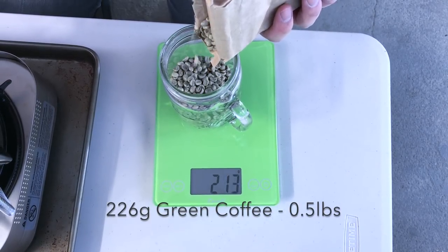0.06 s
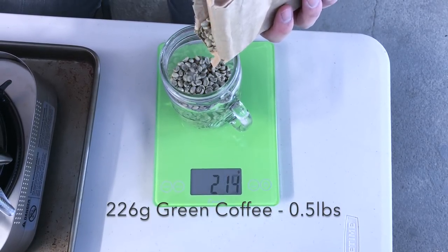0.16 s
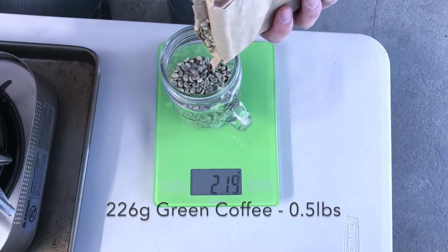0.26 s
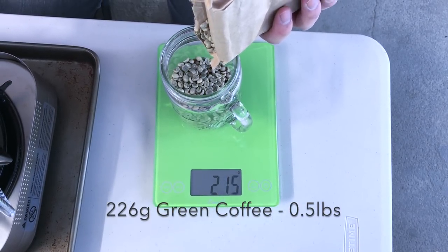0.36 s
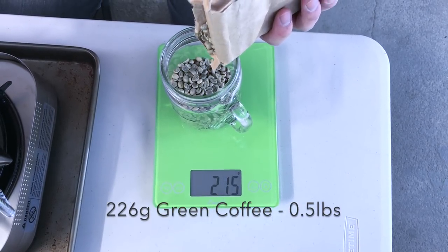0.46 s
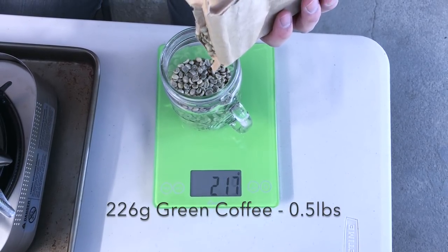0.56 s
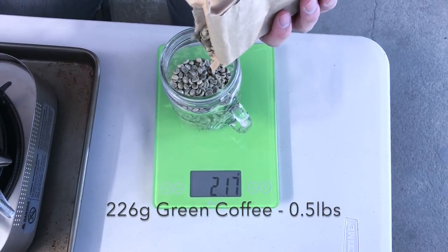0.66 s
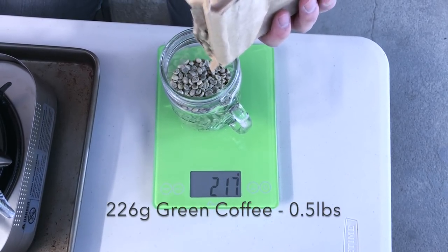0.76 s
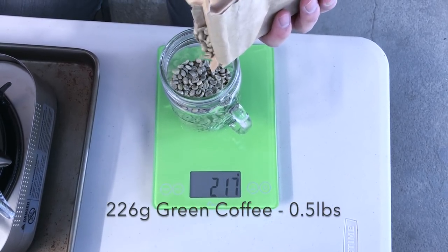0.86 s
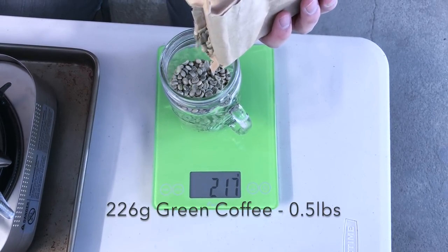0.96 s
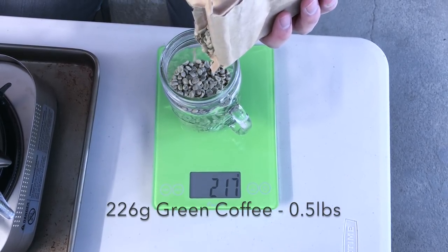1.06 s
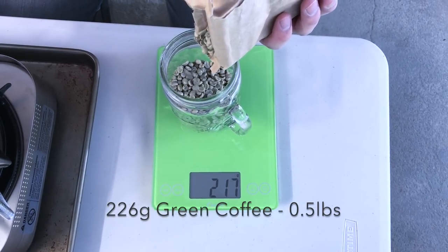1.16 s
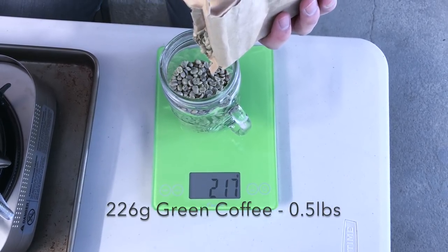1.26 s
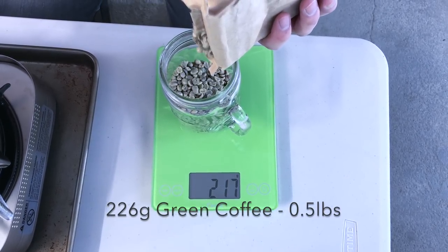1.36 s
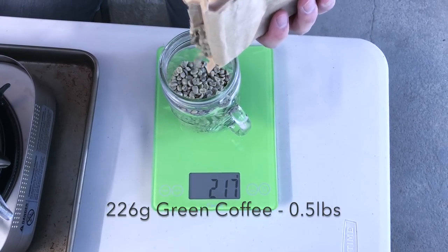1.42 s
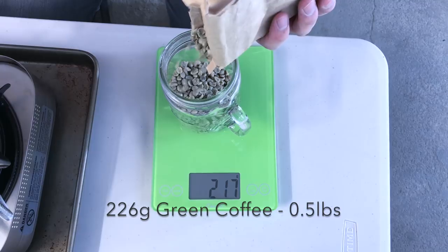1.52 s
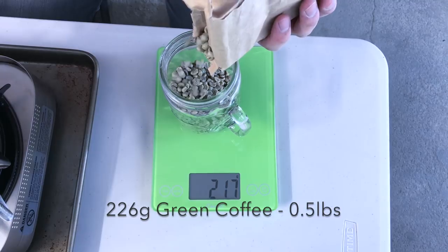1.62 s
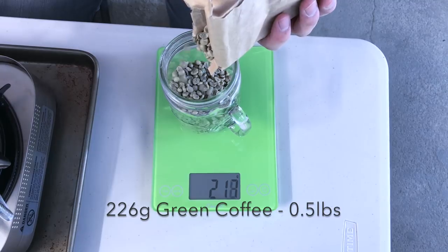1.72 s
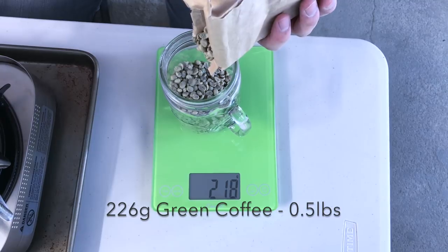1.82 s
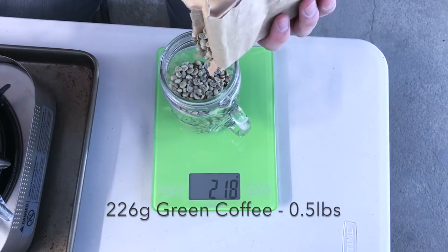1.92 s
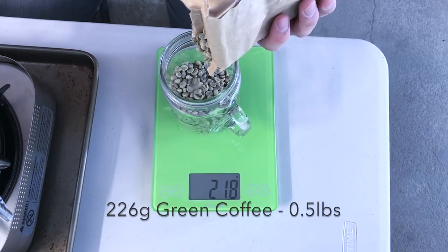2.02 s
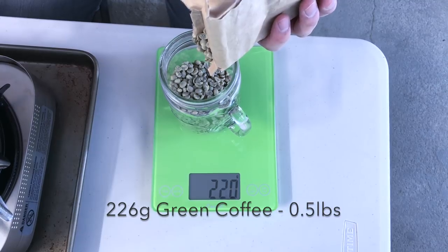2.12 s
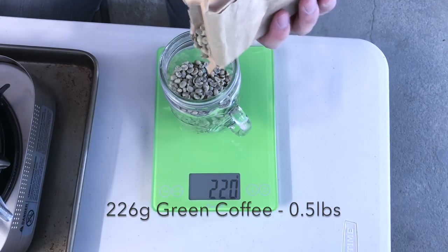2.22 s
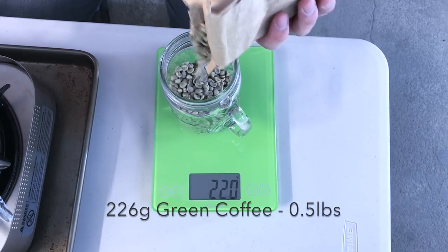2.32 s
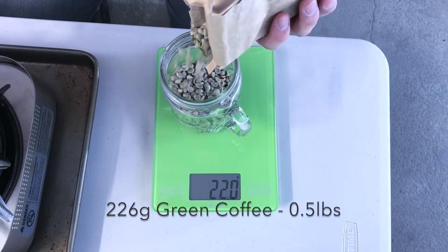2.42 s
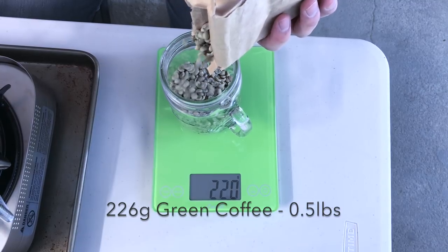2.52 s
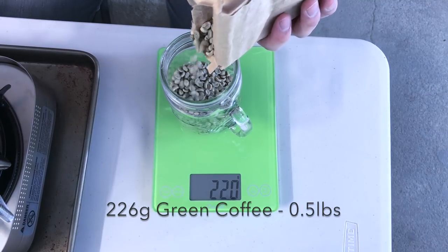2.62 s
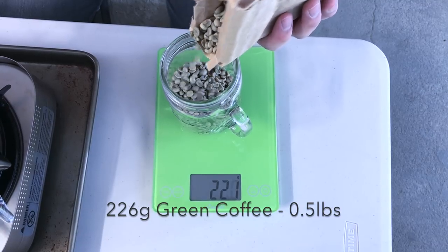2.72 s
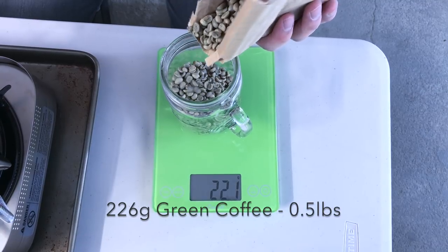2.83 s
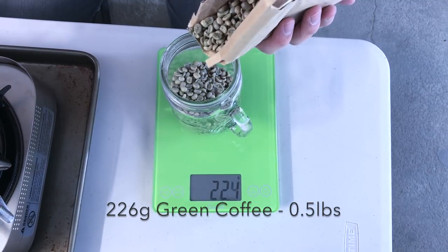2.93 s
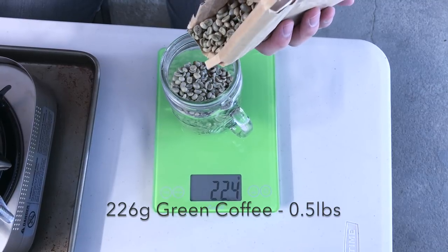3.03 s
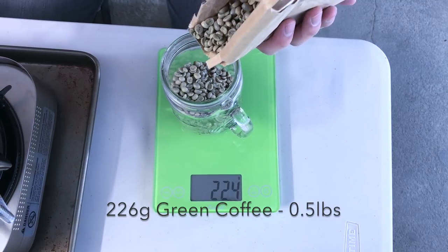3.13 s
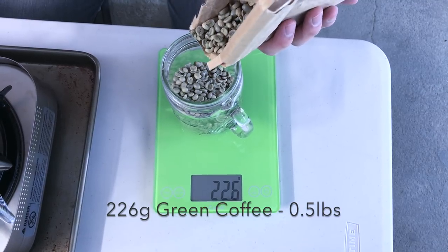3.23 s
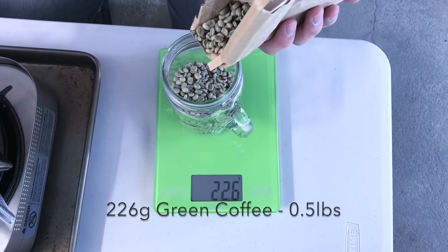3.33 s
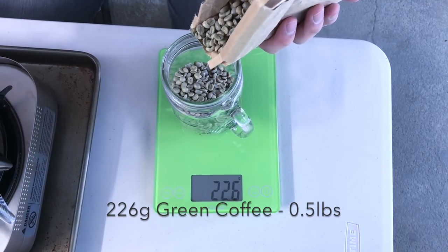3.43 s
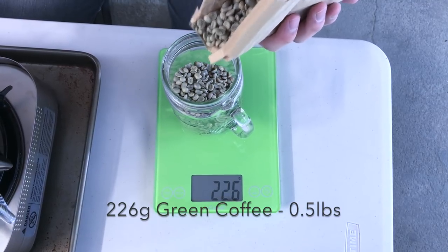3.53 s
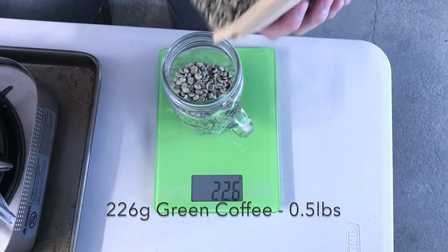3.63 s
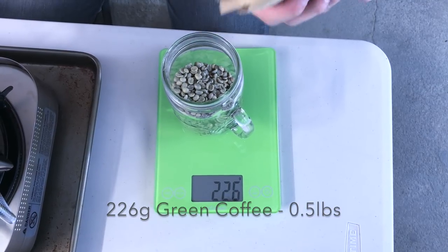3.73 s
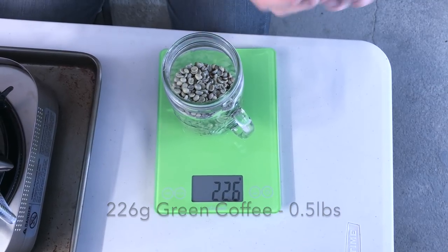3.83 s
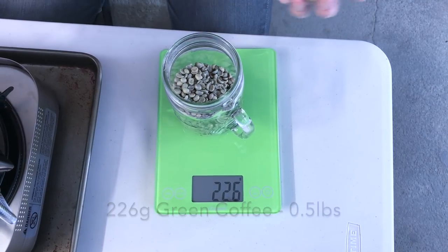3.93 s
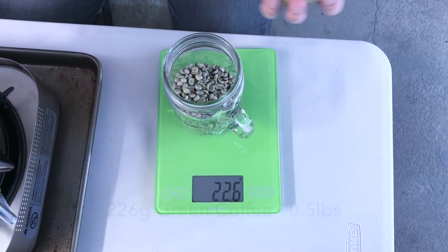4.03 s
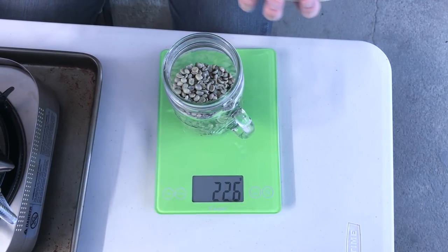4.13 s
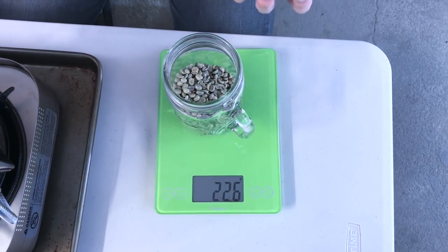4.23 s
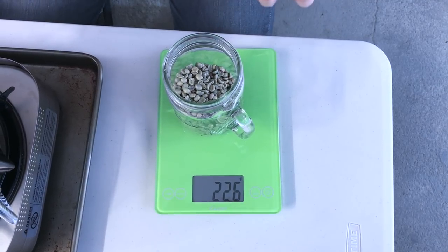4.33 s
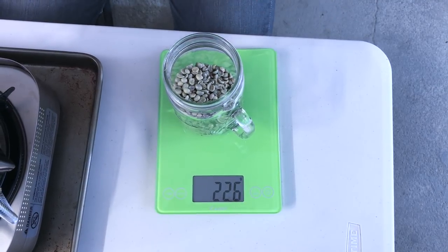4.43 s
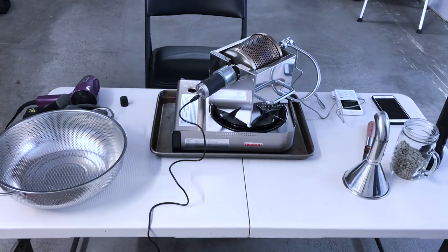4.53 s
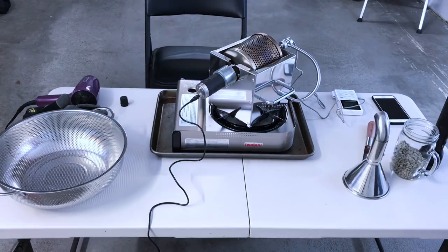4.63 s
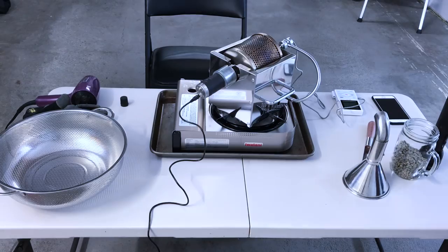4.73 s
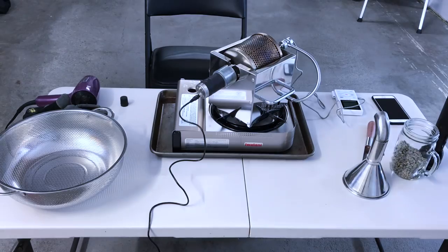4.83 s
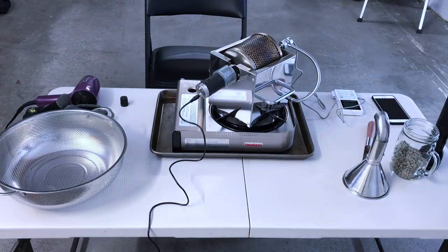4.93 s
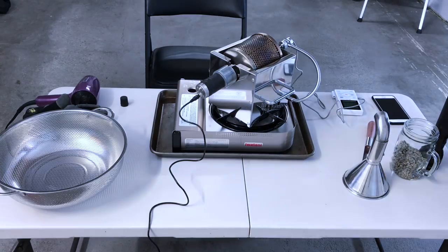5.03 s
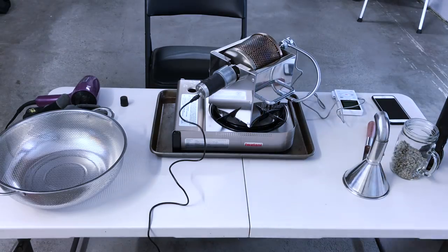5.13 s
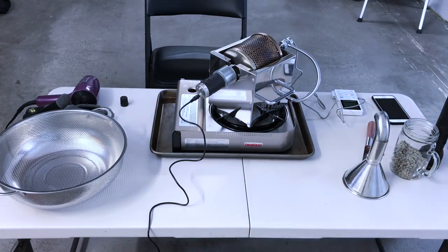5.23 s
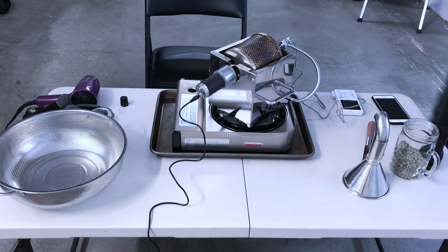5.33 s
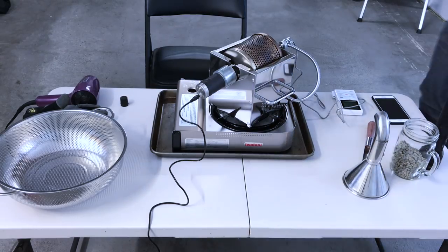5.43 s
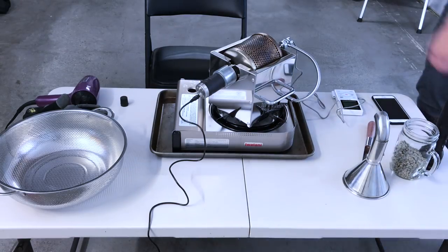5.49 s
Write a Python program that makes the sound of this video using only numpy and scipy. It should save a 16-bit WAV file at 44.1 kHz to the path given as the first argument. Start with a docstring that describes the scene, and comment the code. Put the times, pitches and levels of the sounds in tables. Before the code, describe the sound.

A close microphone in a quiet, hard indoor room with faint low machine hum. Scattered green coffee beans tick into a glass jar during the first 0.3 seconds, crisp and bright with little ringing. After a pause and light paper snaps around 0.7, a sparse shake falls from 0.9 to 1.35. A denser rattle runs from 1.6 to 1.95, led by papery crease pops near 1.55. Sharper snaps at 2.35 to 2.53 introduce another lively burst from 2.5 to 3.0, more glassy, thinning to single beans by 3.2. The bag stirs quietly near 3.5; two barely audible thin whistles glide upward at 3.7 to 4.0. Then the paper bag is gathered in a loud, coarse crumple, swelling from 4.0, peaking at 4.2 with hard snaps and fading by 4.55. A soft double heel boom lands at 4.73, shoes drag faintly at 4.85, and a weaker step and shuffle follow around 5.35 to 5.45.

```python
"""Dried beans are shaken in short bursts from a paper bag into a glass jar on a table, in a quiet hard room.
Each bean is a click smeared into a short rattle, with decaying sine tones for the ringing glass.
The bag is filtered noise that rustles, snaps at its creases, then swells loudly as it is gathered up.
A machine hums, thin sine whistles glide up twice, and near the end a heel booms on the floor
and shoes shuffle as filtered noise."""
import sys
import numpy as np
from scipy import signal
from scipy.io import wavfile
from scipy.ndimage import uniform_filter1d

SR = 44100
rng = np.random.default_rng(int(sys.argv[2]) if len(sys.argv) > 2 else 0)


def generate_wav(signal):
    """Clip the signal to [-1, 1] and save it as 16-bit WAV at the path in sys.argv[1]."""
    frames = np.transpose(np.atleast_2d(signal))
    scaled = np.clip(frames, -1, 1) * 32767
    pcm = np.round(scaled).astype(np.int16)
    wavfile.write(sys.argv[1], SR, pcm)


N = 245195

# colour of the hiss of the paper sheet: [f/Hz, relative level/dB]
SHEET_COLOUR = [(1500, -10), (3800, -3.5), (5100, -5), (6400, -2.5), (8000, -7), (10500, -9), (11500, -6),
                (15600, -10), (16000, -42)]


def amp(db):
    """Turns decibels into a gain."""
    return 10 ** (np.asarray(db) / 20)


def evened(x):
    """Scales a sound to an average (rms) level of 1."""
    return x / np.sqrt(np.mean(x ** 2) + 1e-20)


def curve(rows, column=1, outside=-140.):
    """Joins the points of one table column with straight lines, sample by sample."""
    rows = np.asarray(rows)
    return np.interp(np.arange(N) / SR, rows[:, 0], rows[:, column], outside, outside)


def peaked(top_s, db, rise_db_per_s, fade_db_per_s, start_s, end_s):
    """Gain that climbs to a top and fades at steady rates, silent outside start and end."""
    t = np.arange(N) / SR
    drop_db = np.maximum(rise_db_per_s * (top_s - t), fade_db_per_s * (t - top_s))
    return amp(db - drop_db) * (t >= start_s) * (t < end_s)


def colour(x, points):
    """Filters a sound to a drawn spectrum without sounding ahead: the phase follows from the log gain."""
    hz, db = np.transpose(points)
    grid = abs(np.fft.fftfreq(8192, 1 / SR))
    log_gain = np.log(amp(np.interp(np.log(grid + 1), np.log(hz + 1), db)))
    spectrum = np.exp(np.conj(signal.hilbert(log_gain)))
    taps = np.fft.ifft(spectrum).real[:4096]
    return signal.oaconvolve(x, taps)[:len(x)]


def resonate(x, hz, width):
    """Lets one pitch through best, as a simple resonance does, with gain 1 at its centre."""
    return signal.lfilter(*signal.iirpeak(hz, hz / width, SR), x)


def clicks(per_s, spread_db):
    """Clicks at random moments, most of them small, with rms 1."""
    size = amp(spread_db * np.minimum(rng.exponential(1, N), 4))
    size = size * rng.choice([-1., 1.], N)
    return evened(size * (rng.random(N) < per_s / SR))


def burst(x, t60):
    """Smears each click into a short rattle of noise that fades by 60 dB per t60 (s)."""
    t = np.arange(1500) / SR
    rattle = rng.standard_normal(len(t)) * amp(-60 * t / t60)
    return signal.oaconvolve(x, rattle / np.linalg.norm(rattle))[:N]


def crackle(per_s, spread_db, clump_db, wash=1.0):
    """Dense slips of a rubbed surface: clicks over noise, in clusters where clump_db is above 0."""
    slips = clicks(per_s, spread_db) + wash * rng.standard_normal(N)
    clumps = evened(uniform_filter1d(rng.standard_normal(N), 300))
    return evened(slips * amp(clump_db * clumps))


def room(x):
    """Sparse reflections of random sign, dying away and duller than the source."""
    t60_s, level_db = 0.24, -12
    taps = np.zeros(SR // 2)
    at = np.arange(200, len(taps) - 20, 20)
    taps[at + rng.integers(0, 20, len(at))] = rng.choice([-1., 1.], len(at))
    taps = signal.lfilter([1], [1, -.4], taps)  # dulls each reflection
    taps = taps * amp(-60 * np.arange(len(taps)) / SR / t60_s)
    return amp(level_db) * signal.oaconvolve(x, taps / np.linalg.norm(taps))[:N]


def background():
    """Room air is coloured noise; hum tones are sines with a fuzzy edge; a faint high whine is narrow noise."""
    # colour of the room air: [f/Hz, relative level/dB]
    air_colour = [(12, -53), (20, -17), (91, -1), (156, -8), (206, -11), (428, -16.5), (863, -21),
                  (10200, -35.5), (11500, -32.5), (15200, -37.5), (16500, -49)]
    # tones of the machine: [f/Hz, width of each noise filter/Hz, relative level/dB]
    hum_tones = [(102, 12, -1.5), (200.5, 12, -5.5), (302, 15.4, -13), (152, 18, -13)]
    # loudness of the hum over time: [t/s, level before the tone levels/dB]
    hum_loudness = [(0, -60), (.17, -66), (4.45, -67), (4.6, -76), (5.56, -88)]
    # the high whine: [f/Hz, width of each noise filter/Hz, level/dB]
    whine_tones = [(11180, 200, -85), (11520, 150, -94)]

    def fuzzy(hz, width):
        """Noise narrowed twice around one pitch."""
        return evened(resonate(resonate(rng.standard_normal(N), hz, width), hz, width))

    t = np.arange(N) / SR
    hum = sum(amp(db) * (np.sin(2 * np.pi * hz * t) + 0.12 * fuzzy(hz, width))
              for hz, width, db in hum_tones)
    whine = sum(amp(db) * fuzzy(hz, width) for hz, width, db in whine_tones)
    air = amp(-71.5) * evened(colour(rng.standard_normal(N), air_colour))
    return air + amp(curve(hum_loudness)) * hum + whine


def steps():
    """A foot sets the floor booming in two quick bumps with a rumble dying after, and soles drag."""
    # colour of a sole on the floor: [f/Hz, relative level/dB]
    sole_colour = [(12, -25), (20, -11), (91, -3.5), (127, -23.5), (285, -8), (472, -16.5), (1960, -14.5),
                   (11400, -28), (16000, -36)]
    # soles dragged over the floor: [t of the top/s, level/dB]
    drags = [(4.85, -61.5), (5.432, -62)]
    # a foot coming down: [t/s, peak of the boom/dB, rumble f/Hz, rumble level/dB]
    footfalls = [(4.734, -46.5, 274, -61), (5.339, -63, 540, -65)]
    # ringing modes of the floor: [f/Hz, relative level/dB, time to fade by 60 dB/s]
    floor_modes = [(72, -0.5, 0.17), (171.4, 2.5, 0.23), (212, -3, 0.47), (276.2, 0.5, 0.53),
                   (353, -4, 0.21), (560, -12, 0.069)]
    drag_rise_db_per_s, drag_fade_db_per_s, drag_from_s = 61.5, 54, 4.576
    rumble_width, rumble_fade_db_per_s = 1.85, 86  # filter width as a share of the pitch
    roll_s, roll_db = 0.02414, 0.5  # after the heel, the sole rolls on in a second bump

    rubbing = crackle(per_s=3000, spread_db=2.5, clump_db=0.0)
    level = sum(peaked(s, db, drag_rise_db_per_s, drag_fade_db_per_s, drag_from_s, N / SR)
                for s, db in drags)
    out = level * evened(colour(rubbing, sole_colour))

    t = np.arange(SR // 2) / SR
    boom = sum(amp(db - 60 * t / t60) * np.sin(2 * np.pi * hz * t) for hz, db, t60 in floor_modes)
    boom = boom * np.minimum(t / 0.0046, 1)  # 4.6 ms onset
    boom = boom / abs(boom).max()
    for s, peak_db, hz, rumble_db in footfalls:
        width = rumble_width * hz
        rumble = evened(resonate(resonate(rubbing, hz, width), hz, width))
        out += peaked(s, rumble_db, 0, rumble_fade_db_per_s, s, N / SR) * rumble
        for k in range(2):
            part = out[round((s + k * roll_s) * SR):][:len(t)]
            part += amp(peak_db + k * roll_db) * boom[:len(part)]
    return out


def whistles():
    """Thin sine tones of wavering level whose pitch glides mostly upward."""
    # two whistles, each a list of points: [t/s, f/Hz, level before the waver/dB]
    glides = [
        [(3.72, 9350, -84), (3.77, 10500, -80), (3.8, 11350, -79), (3.835, 11900, -82)],
        [(3.79, 10900, -78), (3.82, 11150, -75), (3.87, 11100, -76), (3.925, 12650, -71), (3.96, 12600, -71),
         (4.0, 12250, -74)],
    ]
    waver = 1 + .5 * evened(uniform_filter1d(rng.standard_normal(N), 150))
    out = np.zeros(N)
    for rows in glides:
        phase = 2 * np.pi * np.cumsum(curve(rows, outside=0)) / SR
        out += amp(curve(rows, column=2)) * waver * np.sin(phase)
    return out


def gathering():
    """The whole bag crumples at once: a broad rush of slips, with brighter scrapes of the sheet."""
    # the bag gathered up, a swell that rises and fades; the sound breaks off abruptly at 4.576 s: [t/s,
    # level/dB]
    swell_level = [(3.6, -79), (3.78, -70.5), (3.79, -64.5), (3.93, -57.5), (4.058, -41), (4.12, -39.5),
                   (4.205, -27.5), (4.268, -37), (4.42, -50.5), (4.57, -63.5), (4.576, -70)]
    # colour of the crumpling: [f/Hz, relative level/dB]
    crumple_colour = [(59, -57), (100, -22), (220, -7), (420, -6), (640, -4.5), (770, -2.5), (1100, 0),
                      (1300, -2), (1470, 0.5), (1600, -4), (1780, 0), (2300, -9.5), (3400, -11),
                      (5000, -22), (7800, -48), (13200, -120)]
    # the sheet scraping: [t of the top/s, width/s, level/dB]
    scrape_list = [(3.688, 0.024, -72), (3.893, 0.0032, -59.5), (4.44, 0.01, -56.5), (4.514, 0.003, -66)]
    hiss_db = -8.5  # hiss of the sheet against the crumpling

    slips = crackle(per_s=3800, spread_db=2.5, clump_db=1.63, wash=0.74)
    rasp = crackle(per_s=2500, spread_db=3.2, clump_db=1.1)
    t = np.arange(N) / SR
    scrapes = sum(amp(db) * np.exp(-.5 * ((t - s) / width_s) ** 2) for s, width_s, db in scrape_list)
    level = amp(curve(swell_level))
    rush = level * evened(colour(slips, crumple_colour))
    bright = (amp(hiss_db) * level + scrapes) * evened(colour(rasp, SHEET_COLOUR))
    return rush + bright


def bag():
    """Beans sliding over paper sound the hollow bag, the sheet adds a hiss, and creases snap."""
    # resonances of the hollow bag: [f/Hz, width of the narrower filter/Hz, relative level/dB]
    hollow_modes = [(520, 1270, -4), (933, 376, 3), (1468, 413, 4.5), (2440, 1160, -6.5), (3620, 600, -13)]
    # jolts that die away: [t of the top/s, rise time/s, level/dB, fade/(dB/s), hiss against level/dB]
    jolt_list = [(0.018, 0.03, -64.5, 74, 1), (0.925, 0.03, -56, 132, -23), (1.466, 0.031, -53.5, 55, -11),
                 (2.371, 0.032, -48.5, 51, -16.5)]
    # bag held tipped, beans creeping over the paper: [start t/s, end t/s, level/dB, hiss against level/dB]
    creep_list = [(0.568, 1.407, -75.5, -2), (2.275, 3.291, -79, 9.5)]
    # creases snapping: [t/s, level/dB, f/Hz, crisp edge against level/dB]
    snap_list = [(0.1125, -62, 2650, 9), (0.718, -55.5, 3880, 3), (0.7525, -59.5, 3900, 3),
                 (0.766, -58, 1490, 1.5), (0.885, -44, 945, -17), (0.92, -44, 970, 0.5),
                 (1.169, -52.5, 674, -21), (1.436, -44.5, 950, -8), (1.479, -46.5, 990, 5),
                 (1.539, -36.5, 1460, -33), (1.573, -40.5, 1580, -9), (1.767, -63, 860, 4),
                 (1.815, -55.5, 646, -18), (2.002, -52, 1330, 1.5), (2.134, -57, 558, -15),
                 (2.149, -51.5, 600, -21), (2.355, -42, 1410, -27), (2.38, -37, 1730, -3),
                 (2.454, -31, 1453, -17), (2.513, -42.5, 1660, -4), (2.527, -37.5, 1240, 1),
                 (3.369, -58, 780, -2.5), (3.506, -61, 895, -20), (3.638, -61, 2320, 0),
                 (3.79, -45.5, 563, -11), (3.821, -48, 1790, -18), (3.826, -44.5, 1730, -18),
                 (4.013, -33, 1580, -2.5), (4.165, -24, 1460, -5), (4.207, -19, 810, -8),
                 (4.248, -32, 1500, -11), (4.226, -20, 1824, -14), (4.369, -30.5, 393, -5),
                 (4.464, -49, 6000, -13), (5.544, -48.5, 303, -13)]
    jolt_rise_db, jolt_lasts_s = 8, 0.65  # gained in one rise time; the end is counted from the top
    creep_in_db_per_s, creep_in_s = 82, 0.14  # creeping swells in, then holds
    overtone, overtone_db = 2.4, -12.5  # second mode of a crease, as a multiple of its pitch

    knocks = crackle(per_s=650, spread_db=2.5, clump_db=3, wash=0.73)
    slip_power = signal.lfilter([1], [1, -.97], knocks ** 2)  # each slip lasts about a millisecond
    slips = np.sqrt(slip_power) * rng.standard_normal(N)
    sliding = slips + 2.7 * knocks
    hollow = evened(sum(amp(db) * resonate(resonate(sliding, hz, width), hz, 3 * width)
                        for hz, width, db in hollow_modes))
    hiss = evened(colour(slips, SHEET_COLOUR))

    out = np.zeros(N)
    for s, rise_s, db, fade_db, hiss_db in jolt_list:
        level = peaked(s, db, jolt_rise_db / rise_s, fade_db, s - 2 * rise_s, s + jolt_lasts_s)
        out += level * (hollow + amp(hiss_db) * hiss)
    for start_s, end_s, db, hiss_db in creep_list:
        level = peaked(start_s + creep_in_s, db, creep_in_db_per_s, 0, start_s, end_s)
        out += level * (hollow + amp(hiss_db) * hiss)

    t = np.arange(600) / SR
    for s, level_db, hz, edge_db in snap_list:
        crack = rng.standard_normal(len(t))
        part = out[round(s * SR):][:len(t)]
        modes = np.sin(2 * np.pi * hz * t) + amp(overtone_db) * np.sin(2 * np.pi * overtone * hz * t)
        body = amp(-60 * t / 0.021) * modes * np.minimum(t / 0.0012, 1)  # 1.2 ms onset
        crisp = evened(resonate(resonate(crack, 1450, 2800), 1620, 5000))
        edge = amp(edge_db - 60 * t / 0.015) * crisp
        part += amp(level_db) * (body + edge)
    return signal.sosfilt(signal.butter(2, 150, "high", fs=SR, output="sos"), out)  # paper radiates no bass


def beans():
    """Each bean is a hard bright tick and a rattle of the heap; square blows add body and ring the glass."""
    # the clearest beans landing: [t/s, relative level/dB, share that rings the glass/dB]
    landings = [(0.016, -32, -29), (0.025, -38, -9), (0.0457, -25, -13), (0.0647, -33, -28),
                (0.1698, -43.5, -1.5), (0.2145, -34, -18), (0.2778, -29.5, -28), (0.891, -27.5, -9),
                (0.9195, -28.5, -22), (1.045, -51, -15), (1.0574, -32.5, -20), (1.063, -34.5, -25),
                (1.094, -56, -2), (1.1428, -33, -21), (1.171, -30.5, -25), (1.177, -39, -25),
                 (1.228, -43, -11), (1.2323, -30, -19), (1.2478, -26, -24), (1.2686, -39, -6),
                (1.331, -35.5, -1), (1.6, -30.5, -8), (1.632, -28, -12), (1.645, -28, -4),
                (1.6677, -28.5, -21), (1.6737, -24.5, -17), (1.6955, -37, -26), (1.7194, -31, -5.5),
                (1.7357, -30, -19), (1.7397, -32, -27), (1.7435, -23.5, -41), (1.749, -32, -19),
                (1.771, -52, -16), (1.7866, -38, -11), (1.7917, -27, -32), (1.812, -25.5, -31),
                (1.8273, -31, -15), (1.8326, -30, -17), (1.85, -38, -23), (1.8657, -31, -2),
                (1.884, -41, -20), (1.8993, -33.5, -2), (1.9077, -29.5, -29), (1.9155, -39, -5),
                (1.929, -42, -4), (1.972, -58, 6), (2.013, -53, -13), (2.1331, -30.5, -28),
                (2.1484, -36, -20), (2.1536, -37, -23), (2.4896, -28.5, -18), (2.535, -31, -8),
                (2.54, -37, 0), (2.576, -38, -3), (2.587, -23, -2), (2.5998, -28.5, -1.5),
                (2.612, -39, 2.5), (2.621, -28.5, -10), (2.672, -29, -8), (2.68, -28, -2),
                (2.705, -31, -21), (2.7137, -30.5, -1.5), (2.7286, -27, -13), (2.7373, -33.5, -21),
                (2.7707, -29.5, -27), (2.779, -30, -11), (2.814, -28.5, -34), (2.8183, -38, -17),
                (2.8649, -28.5, -13), (2.8855, -25.5, -17), (2.91, -38, -12), (2.926, -30, -17),
                (2.944, -45, -11), (2.9632, -33, -17), (2.9864, -43, -17), (3.0565, -41, -10),
                (3.21, -40.5, -7), (3.6591, -49, -16)]
    # fainter beans tumbling among them, one list per burst: [t/s, relative level/dB]
    tumbles = [
        [(0.0, -75), (0.09, -104), (0.33, -77)],
        [(1.04, -92), (1.36, -83)],
        [(1.6, -68), (1.778, -54.5), (1.95, -78)],
        [(2.47, -63), (2.722, -55), (3.3, -97)],
    ]
    # ringing modes of the glass: [f/Hz, relative level/dB, time to fade by 60 dB/s]
    glass_modes = [(2210, -26, 0.17), (2255, -28, .22), (2300, -26, 0.17), (5390, -16, 0.024),
                   (5780, -15, 0.025), (6050, -14, 0.025), (7180, -21, .038), (8070, -22, .04),
                   (8390, -20, 0.04), (8800, -24, .04), (9760, -22, .025), (11350, -19, .03),
                   (12800, -20, .03)]
    # colour of the hard tick: [f/Hz, relative level/dB]
    tick_colour = [(500, -12), (2000, -18), (4000, -14), (7000, -10.5), (10000, -2.5), (13000, 0.5),
                   (15500, 4), (17000, -34)]
    # fuller body of a square blow: [f/Hz, relative level/dB]
    thud_colour = [(300, -15.5), (620, 2), (1300, -7), (2100, -23), (2700, -5), (6000, -4), (9000, -5),
                   (14000, -13)]
    thud_follows = 0.35  # dB of body per dB of glass share
    flutter_db = 2.5  # beans shifting against the wall make the ring uneven

    # landings take turns in eight lanes, each with its own random rattle
    lanes = 8
    hits, thuds = np.zeros((lanes, N)), np.zeros((lanes, N))
    wall = np.zeros((len(glass_modes), N))
    for k, (s, level_db, glass_db) in enumerate(landings):
        at = round(s * SR)
        spot_db = 4.5 * rng.standard_normal(len(glass_modes))  # where it strikes picks the modes
        # the three lowest modes depend more on how square the blow is
        spot_db[:3] = 0.53 * spot_db[:3] + 1.7 * glass_db
        late, soft = rng.random(2)
        # each bean bounces once, 3 to 9 ms later and 27 to 41 dB softer
        again = round((s + 0.003 + 0.006 * late) * SR)
        hits[(k + 1) % lanes, again] = amp(level_db - 41 + 14 * soft)
        hits[k % lanes, at] = amp(level_db)
        thuds[k % lanes, at] = amp(level_db + thud_follows * glass_db)
        wall[:, at] = amp(level_db + glass_db + spot_db)
    faint = sum(amp(curve(rows)) for rows in tumbles) * clicks(per_s=800, spread_db=11)

    t = np.arange(SR // 3) / SR
    ring = np.zeros(N)
    for blows, (hz, db, t60) in zip(wall, glass_modes):
        tone = amp(db - 60 * t / t60) * np.sin(2 * np.pi * hz * t)
        ring += signal.oaconvolve(burst(blows + 0.11 * faint, t60=0.015), tone)[:N]
    ring = ring * amp(flutter_db * evened(uniform_filter1d(rng.standard_normal(N), size=250)))

    # bare click, very short crack and longer rattle of the heap
    contact = sum(0.69 * h + 1.37 * burst(h, t60=0.00072) + 1.3 * burst(h, t60=0.017) for h in hits)
    contact = contact + 0.46 * burst(faint, t60=0.011)
    body = sum(.9 * burst(h, t60=0.003) + 1.15 * burst(h, t60=0.045) for h in thuds)
    body = body + 0.25 * burst(faint, t60=0.014)
    return 1.63 * colour(contact, tick_colour) + 1.7 * colour(body, thud_colour) + 0.61 * ring


def scene():
    """Adds all sources; beans, rustling bag and whistles also get the room's reflections."""
    near = beans() + bag() + whistles()
    return (near + room(near) + gathering() + steps() + background())[None]


def record(dry):
    """Takes away the treble above about 16.7 kHz."""
    taps = signal.firwin(255, 16700, window=("kaiser", 9), fs=SR)
    return signal.oaconvolve(dry, taps[None], "same")


dry = scene()
out = record(dry)
generate_wav(out)
```